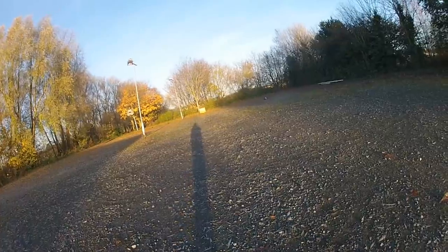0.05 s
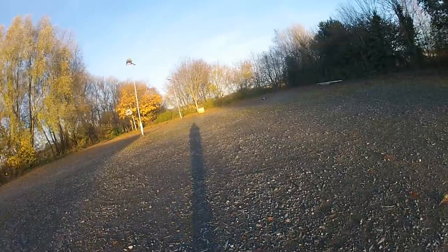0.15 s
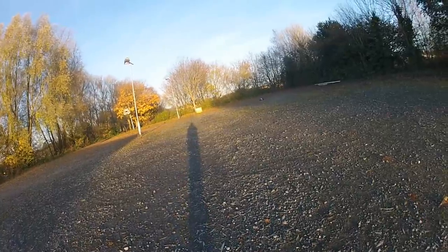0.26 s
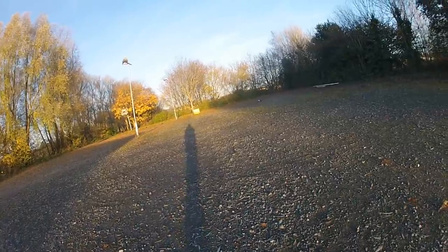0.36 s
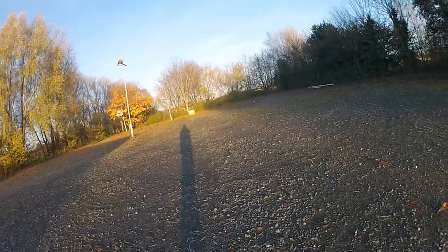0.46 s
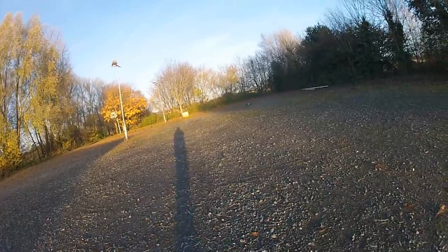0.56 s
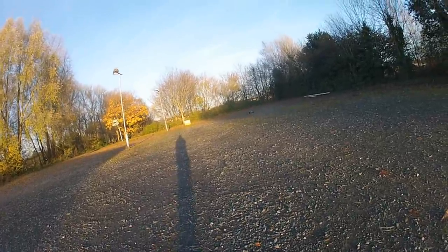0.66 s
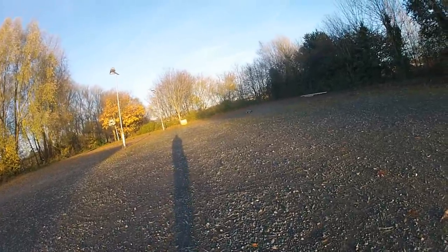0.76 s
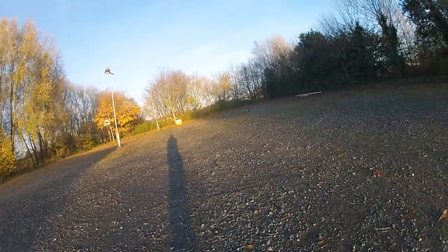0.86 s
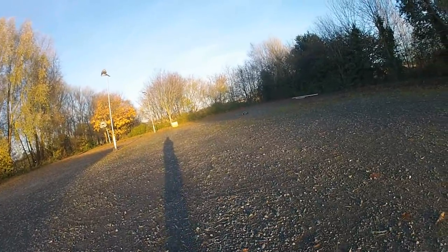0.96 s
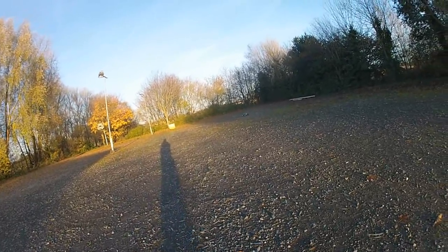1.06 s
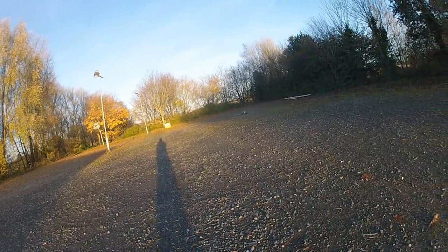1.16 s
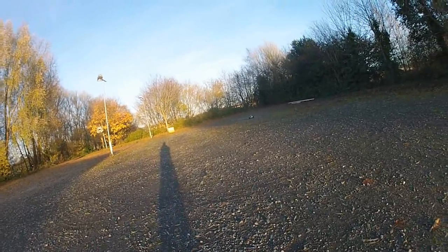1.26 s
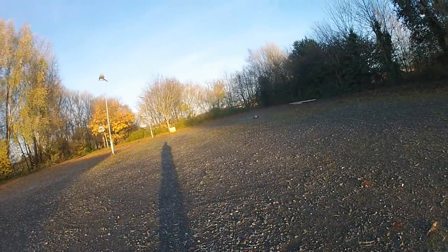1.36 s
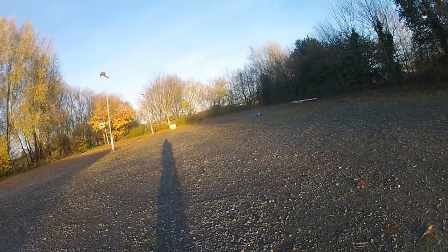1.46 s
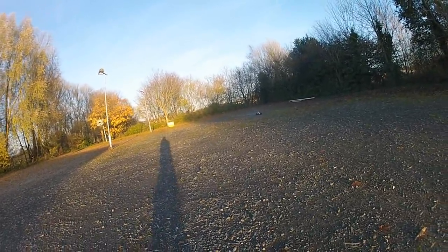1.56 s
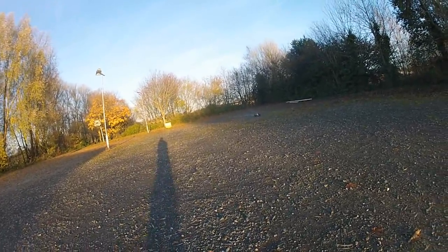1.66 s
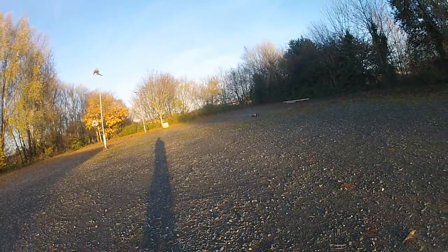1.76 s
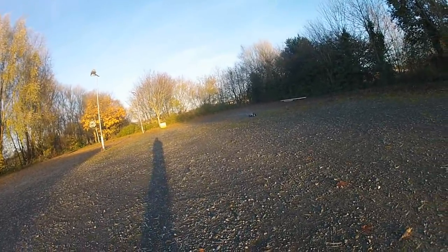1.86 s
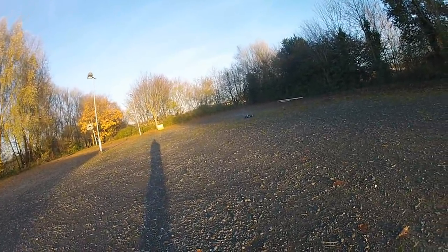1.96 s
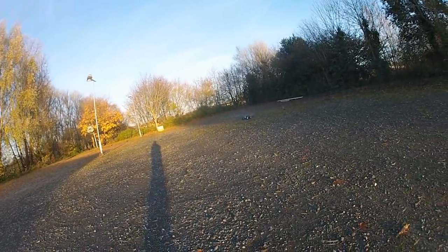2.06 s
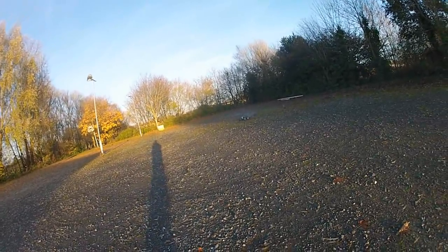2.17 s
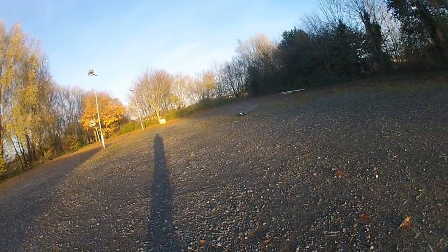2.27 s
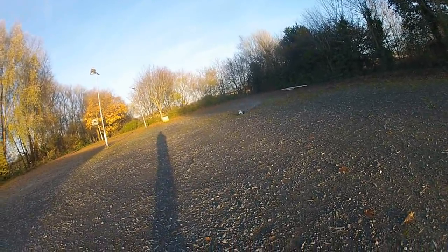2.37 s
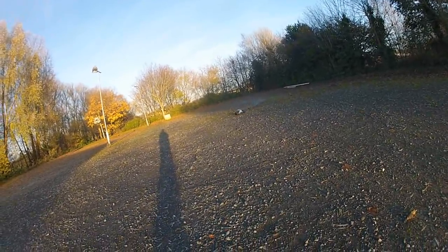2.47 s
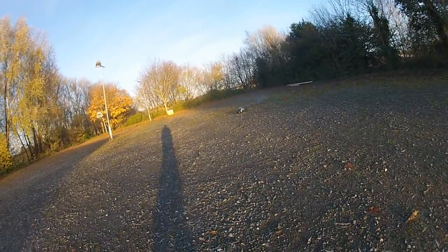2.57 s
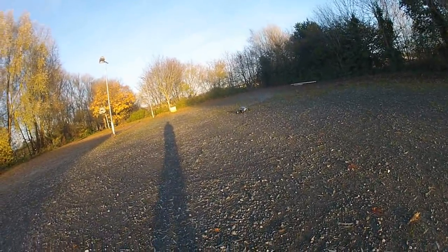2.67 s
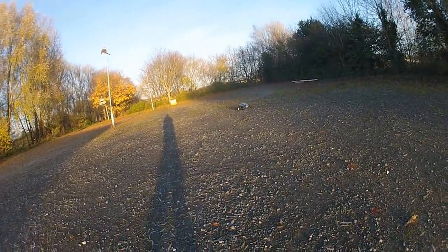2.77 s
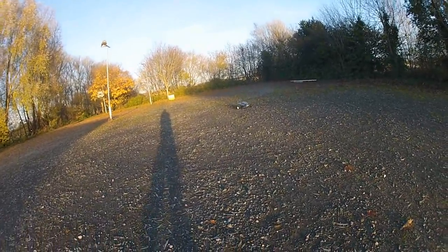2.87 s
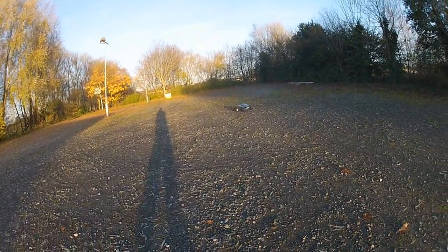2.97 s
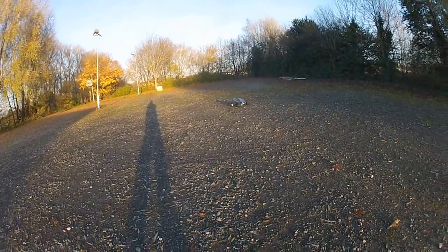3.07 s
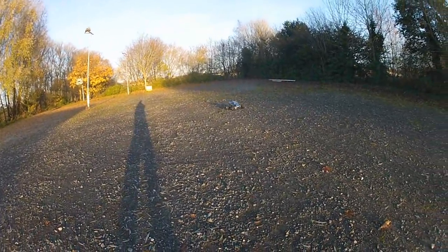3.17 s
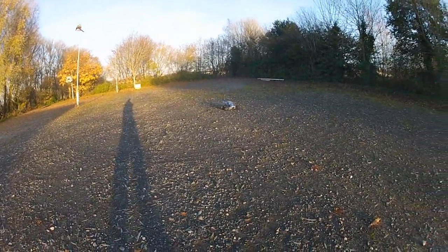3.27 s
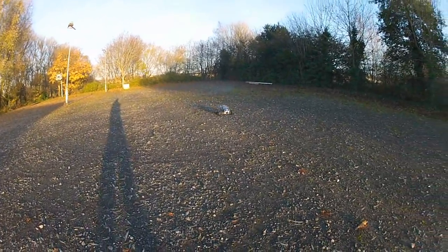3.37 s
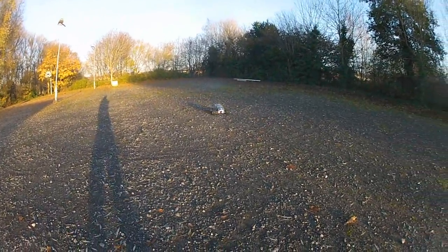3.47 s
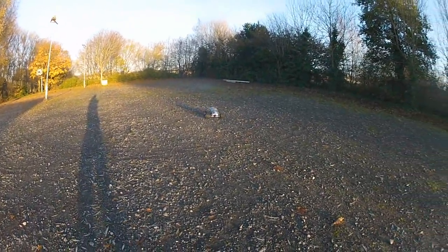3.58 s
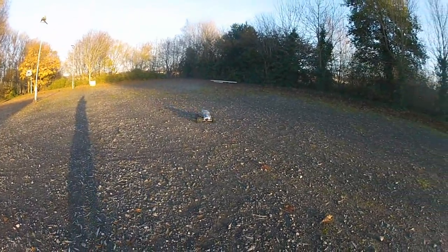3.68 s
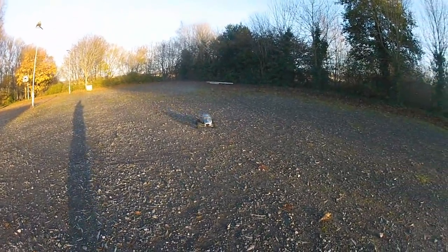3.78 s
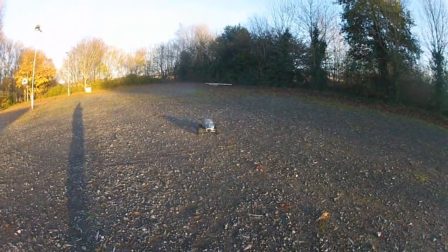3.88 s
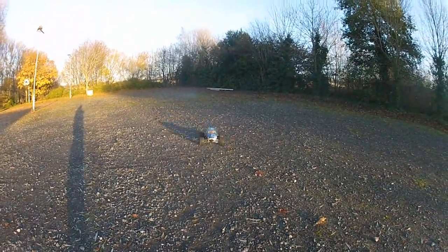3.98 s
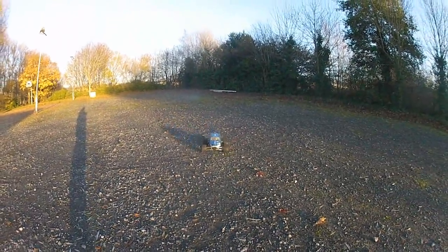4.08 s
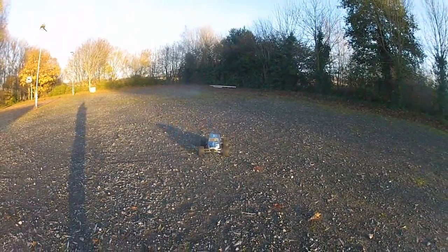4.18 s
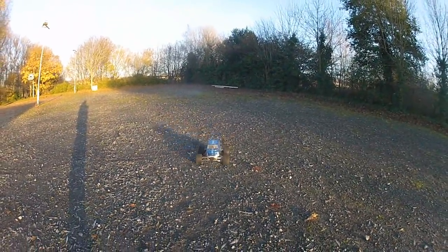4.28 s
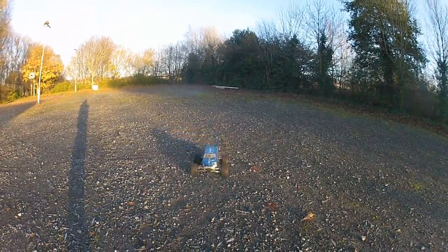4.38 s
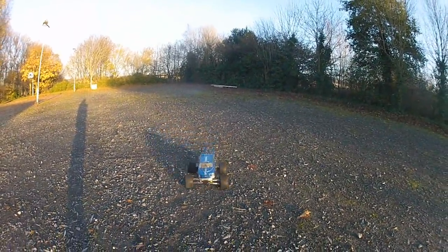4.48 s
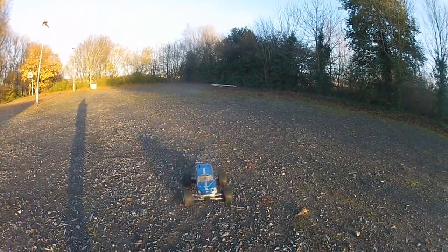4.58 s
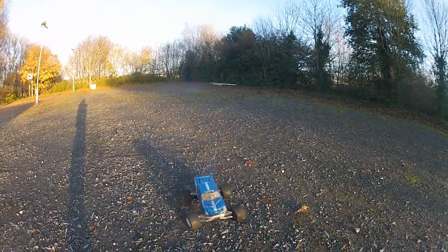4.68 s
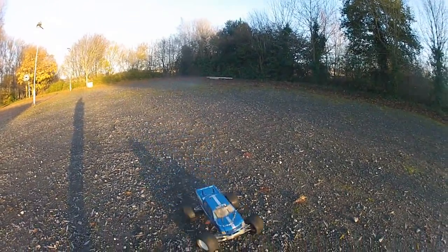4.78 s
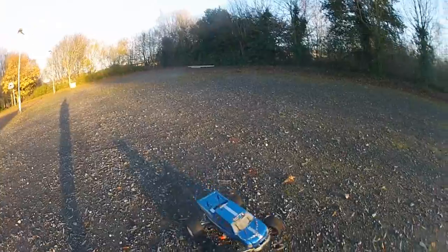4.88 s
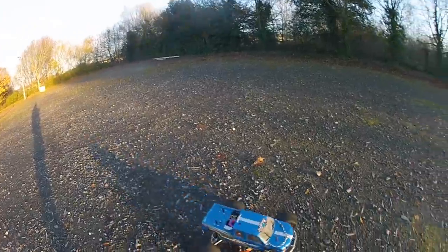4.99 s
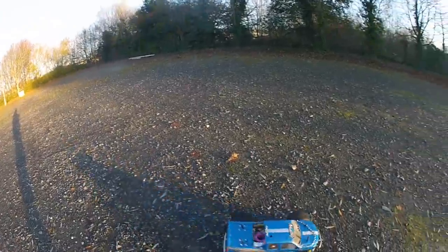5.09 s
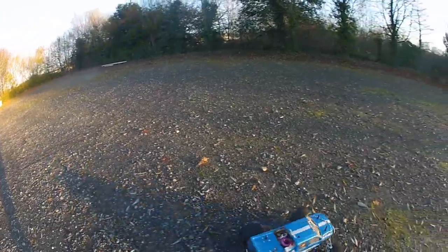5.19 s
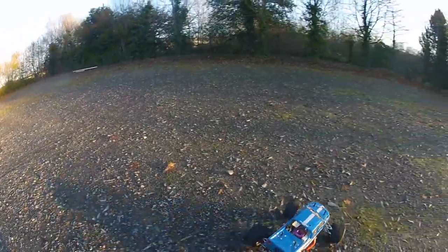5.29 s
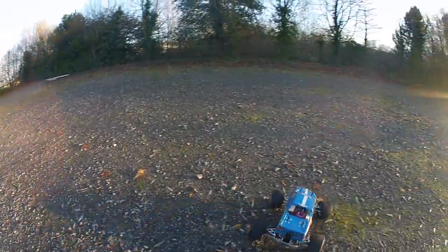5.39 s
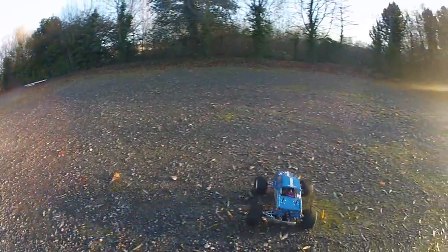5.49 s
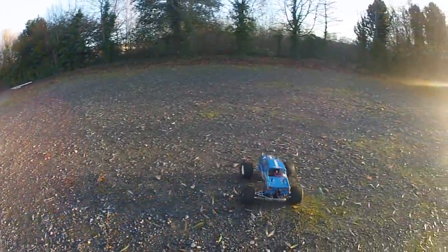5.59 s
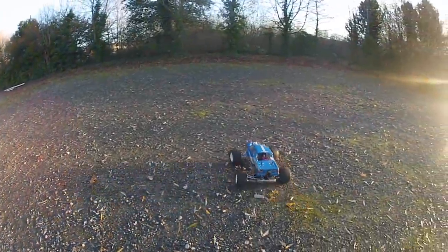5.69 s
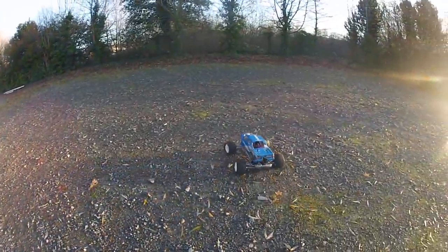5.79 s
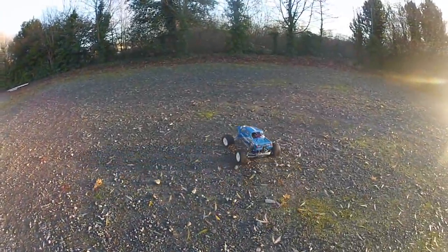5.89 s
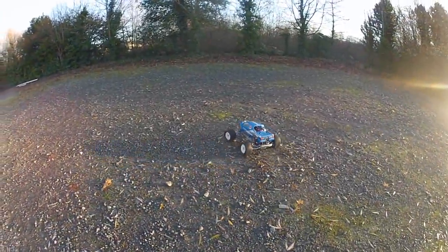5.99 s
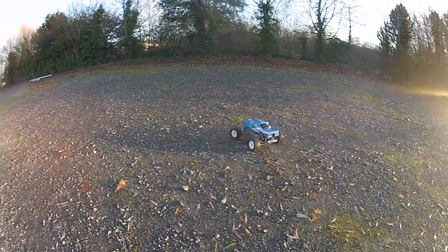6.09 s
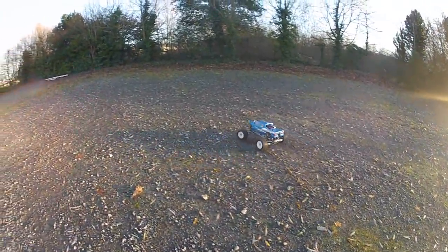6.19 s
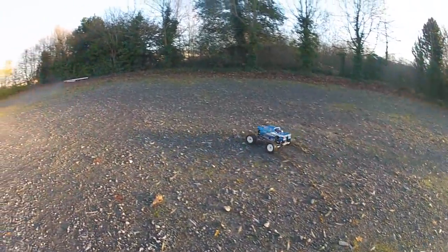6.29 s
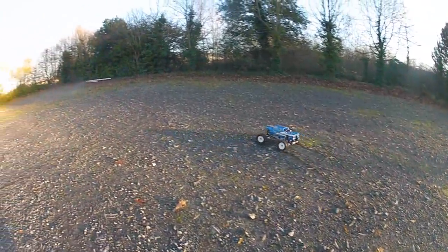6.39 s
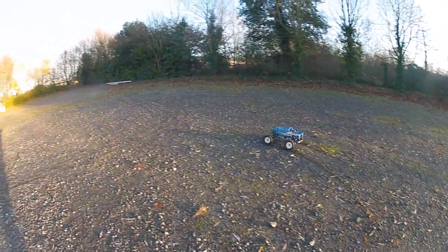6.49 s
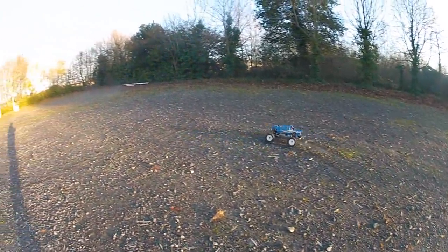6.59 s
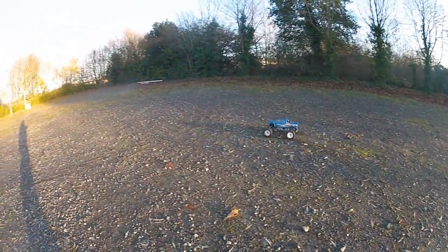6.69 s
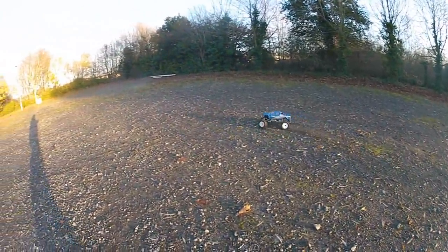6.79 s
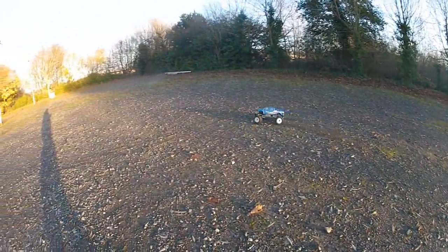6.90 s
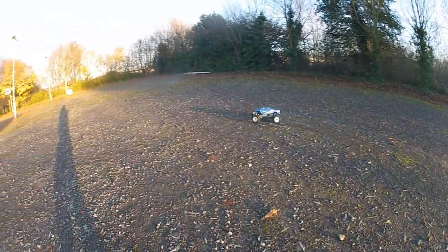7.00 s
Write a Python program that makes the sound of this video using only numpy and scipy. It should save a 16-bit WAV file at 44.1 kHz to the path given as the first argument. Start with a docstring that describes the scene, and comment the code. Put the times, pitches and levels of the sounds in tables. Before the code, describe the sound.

A small two-stroke model truck buzzes far off, climbs to a scream, coasts up close with a metallic whine, then pulls hard again outdoors.

```python
"""A small two-stroke engine on a model truck revs far off on a gravel lot, coasts up close and pulls hard again.
Each turn of the crank fires one exhaust pulse, which rings in the pipe; a thin metallic whine rides on top.
The lot adds echoes and the ground thins three bands. Shaped noise makes the wind and the roll of the tyres,
short low rings make the knocks on a hard camera case, and snaps of noise make ticks and one hard burn.
The camera's recorder holds each sample for 1/12000 s, which adds a mirrored treble."""
import sys
import numpy as np
from scipy import signal
from scipy.fft import rfft, irfft, next_fast_len
from scipy.io import wavfile
from scipy.ndimage import uniform_filter1d

SR = 44100
rng = np.random.default_rng(int(sys.argv[2]) if len(sys.argv) > 2 else 0)


def transcribe(signal):
    """Save signal, clipped to [-1, 1], as a 16-bit WAV file at the path in sys.argv[1]."""
    frames = np.atleast_2d(signal).T
    limited = np.clip(frames, -1, 1)
    pcm = np.round(limited * 32767).astype(np.int16)
    wavfile.write(sys.argv[1], SR, pcm)


N = 310905
TIME = np.arange(N) / SR


def gain_of(db):
    """Turns decibels into a plain multiplier."""
    return 10 ** (np.asarray(db) / 20)


def evened(x):
    """Scales a sound to an average strength (rms) of 1."""
    return x / np.sqrt(np.mean(x ** 2) + 1e-20)


def steadied(x, size=4096):
    """Holds the running strength (rms over size samples) at 1."""
    return x / np.sqrt(abs(uniform_filter1d(x ** 2, size)) + 1e-20)


def columns(table):
    """Draws each column of a timed table as a curve with one value per sample."""
    seconds, *values = np.transpose(table)
    return [np.interp(TIME, seconds, v) for v in values]


def share_of(table):
    """Draws a one-column table as a curve kept between 0 and 1."""
    return np.clip(columns(table)[0], 0, 1)


def coloured(x, points):
    """Filters a sound by a spectrum given as (Hz, dB) points."""
    size = next_fast_len(N + 8192)
    hz = np.fft.rfftfreq(size, 1 / SR)
    point_hz, point_db = np.transpose(points)
    db = np.interp(np.log(hz + 1), np.log(point_hz + 1), point_db)
    return irfft(rfft(x, size) * gain_of(db), size)[:N]


def resonate(x, hz, width_hz):
    """Keeps a band around a moving pitch: shifts it down to zero, smooths, and shifts back."""
    turn = np.exp(2j * np.pi * np.cumsum(hz * np.ones(len(x))) / SR)
    r = np.exp(-np.pi * width_hz / SR)
    smooth = signal.lfilter([1 - r], [1, -r], x / turn)
    return 2 * (turn * smooth).real


def drift(seconds):
    """Wanders by chance with rms 1, its noise smoothed twice over this many seconds."""
    size = round(seconds * SR)
    return evened(uniform_filter1d(uniform_filter1d(rng.standard_normal(N), size), size))


def bumps(table):
    """Adds up smooth humps, one for each row of middle, height and spread."""
    return sum(height * np.exp(-.5 * ((TIME - s) / spread) ** 2) for s, height, spread in table)


# How near the truck is. Each row: time in seconds, closeness in dB.
CLOSENESS = [(0, -35.5), (.7, -23), (1.3, -15.5), (2.2, -9), (2.7, -7.5), (3.1, -9.5), (3.7, -12.5),
             (4.4, -6.5), (4.9, 3.5), (5.15, 10.5), (5.8, -2), (6.3, -2), (7.05, 10)]
# How far the throttle is open. Each row: time in seconds, opening from 0 (shut) to 1 (open).
THROTTLE = [(0, 0.8), (1.4, 0.22), (2.1, 0.41), (2.3, 0.44), (2.36, 0.17), (2.65, 0.42), (2.95, 0),
            (4.5, 0.23), (5.4, 0.39), (5.55, 0.86), (7.05, 0.58)]
# How two layers follow the truck. Each entry: level in dB at closeness 0 with the throttle shut,
# dB for each dB of closeness, dB added by full throttle.
LAYERS = {"body": (-39.5, 0.59, 15.9), "roll": (-30, 0.61, 0)}


def level(name):
    """Sets a layer's gain: a nearer truck and a wider throttle can each make it louder."""
    base_db, slope, throttle_db = LAYERS[name]
    return gain_of(base_db + slope * columns(CLOSENESS)[0] + throttle_db * share_of(THROTTLE))


# The smooth engine speed. Each row: time in seconds, firings a second.
ENGINE_SPEED = [(0, 204), (.1, 237), (.19, 248), (.45, 251), (.95, 305), (1.22, 335), (1.33, 317),
                (1.4, 342), (1.62, 350), (1.72, 385), (2.03, 400), (2.15, 390), (2.27, 416), (2.312, 412),
                (2.335, 336), (2.37, 338), (2.39, 300), (2.41, 299), (2.44, 268), (2.535, 274),
                (2.575, 294), (2.595, 317), (2.64, 330), (2.68, 324), (2.73, 325), (2.79, 270), (2.84, 240),
                (2.98, 226), (3.06, 190), (3.32, 182), (3.78, 159), (4.15, 149), (4.53, 146), (4.75, 142),
                (4.91, 139), (5.25, 139), (5.28, 145), (5.45, 147.4), (5.54, 169.6), (5.61, 180),
                (5.79, 187.4), (6.12, 195.4), (6.3, 207.2), (6.67, 256), (6.78, 279), (6.8, 275),
                (6.84, 291), (6.92, 296), (6.94, 306), (6.96, 304), (6.995, 311), (7.05, 306)]


def firing_rate():
    """Gives the smooth engine speed in Hz, before skips and flutter."""
    return columns(ENGINE_SPEED)[0]


# Tone of the wind rumble. Each row: pitch in Hz, relative level in dB per Hz.
WIND_TONE = [(15, -29), (30, -7.5), (55, 0.5), (100, -4), (200, -9), (350, -16), (500, -25), (1000, -55.5)]
# Gusts over the steady wind. Each row: middle in seconds, rise in dB (below zero a lull), spread in seconds.
GUSTS = [(.3, -3.5, 0.22), (1.55, -2, 0.072), (3.18, 7.5, 0.089), (4.398, 3, 1), (5.057, 9, 0.16),
         (6.595, 4.5, 0.14)]
WIND_DB = -41  # steady level


def wind(lumps_db=2.6):
    """Wind pushing on the microphone: a lumpy low rumble of filtered noise with gusts."""
    lumpy = rng.standard_normal(N) * gain_of(lumps_db * drift(0.17))
    return gain_of(WIND_DB + bumps(GUSTS)) * evened(coloured(lumpy, WIND_TONE))


# Tone of the rolling noise. Each row: pitch in Hz, relative level in dB per Hz.
ROLL_TONE = [(80, -45), (160, -5), (260, -2.5), (420, -7.5), (700, -17.5), (1500, -12.5), (2500, -17.5),
             (4000, -22.5), (5800, -35.5)]
ROLL_SPEED_DB = 1.5  # added for each doubling of the revs


def roll(lumps_db=1.7):
    """Tyres and air: dull, grainy filtered noise that grows with closeness and revs."""
    grainy = rng.standard_normal(N) * gain_of(lumps_db * drift(0.023))
    speed_gain = gain_of(ROLL_SPEED_DB * np.log2(firing_rate() / 200))
    return level("roll") * speed_gain * evened(coloured(grainy, ROLL_TONE))


# Knocks on the case. Each row: start in seconds, peak in dB, pitch in Hz.
KNOCKS = [(0.4773, -14, 260), (0.699, -23.5, 265), (0.737, -16.5, 265), (0.854, -25, 271),
          (0.999, -32, 297), (1.307, -26, 295), (1.341, -22, 152), (1.59, -25, 99), (1.789, -23.5, 384),
          (1.911, -29, 213), (2.178, -25, 366), (2.422, -20, 226), (2.641, -23, 229), (2.712, -19.5, 275),
          (2.8, -22, 200), (3.157, -13, 228), (3.384, -30, 172), (6.697, -17.5, 198), (6.836, -15, 260),
          (6.882, -19, 240), (7.016, -12, 345)]


def knocks(t60=0.07):
    """The case rings low and briefly at three pitches; t60 is the seconds to fall by 60 dB."""
    out, t = np.zeros(N + 8000), np.arange(4000) / SR
    for (s, db, hz), turn in zip(KNOCKS, rng.random((len(KNOCKS), 2))):
        boom = -np.sin(2 * np.pi * hz * t)
        boom += 0.61 * np.sin(2 * np.pi * (0.5 * hz * t + turn[0]))
        boom += 0.26 * np.sin(2 * np.pi * (2.15 * hz * t + turn[1]))
        boom *= (1 - np.exp(-t / 0.000061)) * gain_of(-60 * t / t60)
        out[round(s * SR):][:4000] += gain_of(db) * boom / abs(boom).max()
    return out[:N]


# Sharp ticks and softer crackles; the one at 4.916 s is a single hard burn of the engine.
# Each row: start in seconds, peak in dB, pitch in Hz,
# strength of the treble snap in dB before the whole sound is scaled to its peak.
TICKS_AND_BURN = [(0.4748, -16, 2000, 2), (0.7395, -12, 2080, -4), (1.339, -14, 2070, -4),
                  (2.5928, -16, 1750, -6), (4.916, -10, 2100, -6), (1.104, -26, 1100, -18),
                  (1.13, -27, 1270, -18), (1.594, -27, 1500, -14), (1.6714, -24, 1500, -20),
                  (1.8474, -28, 1280, -20), (2.016, -26, 1610, -20), (2.179, -22, 1430, -20),
                  (2.635, -23, 1900, -20), (2.7075, -22, 1400, -20), (2.755, -24, 1000, -20),
                  (2.796, -21, 1330, -16), (2.8966, -24, 1420, -20)]


def ticks_and_burn(t60=0.02, ring_t60=0.035):
    """Each is a fading burst of noise around one pitch, a treble snap and a brief high ring."""
    out, t = np.zeros(N + 8000), np.arange(4000) / SR
    for (s, db, hz, snap_db), hiss in zip(TICKS_AND_BURN, rng.standard_normal((len(TICKS_AND_BURN), 4000))):
        band = resonate(resonate(hiss, hz, 2040), hz, 2040)
        snap = gain_of(snap_db) * np.diff(hiss, prepend=0)
        burst = (band + snap) * gain_of(-60 * t / t60)
        burst += 0.45 * np.sin(2 * np.pi * hz * t) * gain_of(-60 * t / ring_t60)
        out[round(s * SR):][:4000] += gain_of(db) * burst / abs(burst).max()
    return out[:N]


# Share of the engine's power that arrives scattered by ground and trees. Each row: time in seconds, share 0 to 1.
SCATTER = [(0, .14), (.8, .1), (2.2, .1), (2.35, .05), (2.8, .08), (3.4, .25), (4.5, .07), (5.4, .07),
           (5.6, .04), (7.05, .03)]
# Filter for the long waves that pass unscattered. Each row: pitch in Hz, level in dB.
LONG_WAVES = [(500, 0), (900, -40)]


def lot(x, t60=0.37, first_s=.006):
    """Sparse, fading echoes smear the tones when the revs move; three sets of them take turns over time."""
    share, t = share_of(SCATTER), np.arange(12000) / SR
    taps = rng.standard_normal((3, 12000)) * (rng.random((3, 12000)) < .03)
    taps *= (t > first_s) * gain_of(-60 * t / t60)
    taps /= np.linalg.norm(taps, axis=1)[:, None]
    # the squares of the three turns sum to 1.5 before the factor, 1 after
    turn = np.sqrt(2 / 3) * np.cos(np.pi * (TIME / 0.776 + np.arange(3)[:, None] / 3))
    echoes = signal.fftconvolve(x * np.sqrt(share) * turn, taps, axes=1).sum(0)[:N]
    low = coloured(x, LONG_WAVES)  # long waves pass the stones and leaves unscattered
    return low + np.sqrt(1 - share) * (x - low) + echoes - coloured(echoes, LONG_WAVES)


# Bands cancelled by the echo off the ground. Each row: time in seconds, pitch of the lower band in Hz,
# depth from 0 to 1.
GROUND_DIP = [(0, 3550, .2), (.8, 3300, .5), (2.5, 3280, .7), (3.4, 3300, .7), (3.7, 2720, .75),
              (4.4, 2700, .85), (4.7, 2690, 1), (5.4, 2670, 1), (5.6, 2860, .7), (6.2, 3130, .7),
              (7.05, 3360, .7)]
DIP_WIDTH_HZ, SECOND_DIP, SECOND_WIDTH_HZ = 420, 1.77, 900  # the second band lies 1.77 times higher


def ground_echo(x):
    """The echo off the ground cancels two moving bands, so each is taken out of the sound."""
    dip_hz, depth = columns(GROUND_DIP)
    x = x - depth * resonate(x, dip_hz, DIP_WIDTH_HZ)
    return x - depth * resonate(x, SECOND_DIP * dip_hz, SECOND_WIDTH_HZ)


# A narrow moving band thinned by the engine's echo off the ground. Each row: time in seconds, pitch in Hz,
# depth from 0 to 1.
LOW_GROUND_GAP = [(0, 1740, 0.66), (4.45, 1920, 0), (4.55, 1510, 0.7), (4.7, 1540, 1), (4.95, 1480, 1),
                  (5.1, 2000, 0.35), (5.3, 2040, .65), (5.45, 1910, 0.2), (5.65, 2010, 1), (6.05, 1810, 0),
                  (6.2, 1930, 0.6), (6.35, 1880, 0.5), (6.6, 2100, 0), (7.05, 2100, 0)]
GAP_WIDTH_HZ = 144


def low_ground_gap(x):
    """The engine's echo off the ground also thins a narrow moving band at a lower pitch."""
    gap_hz, depth = columns(LOW_GROUND_GAP)
    return x - np.clip(depth, 0, 1) * resonate(x, gap_hz, GAP_WIDTH_HZ)


def ring(x, hz, damping, narrow_hz=150, wide_hz=560):
    """Rings at a moving pitch, blending a narrow band into a wide one as damping grows; ends near rms 1."""
    share = np.clip(damping, 0, 1)
    narrow = steadied(resonate(resonate(x, hz, narrow_hz), hz, narrow_hz))
    wide = steadied(resonate(resonate(x, hz, wide_hz), hz, wide_hz))
    return steadied((1 - share) * narrow + share * wide)


# Flares of the revs as the wheels skip over stones. Each row: middle in seconds, rise in Hz before its
# short-time mean is taken off (below zero a sag as the wheels bite).
SKIPS = [(0.884, 24), (.945, 12), (0.997, 36), (1.062, 46), (1.107, 42), (1.167, 55), (1.213, 41),
         (1.294, 34), (1.384, 37.5), (1.536, 30), (1.635, 38.5), (1.758, 51), (1.808, 26.5), (1.873, 42),
         (1.956, 17.5), (2.044, 31), (2.126, 22), (2.163, 55.5), (2.207, 42), (2.262, 50), (2.299, 27),
         (2.37, 14.5), (2.635, 16), (2.7, 30), (6.822, 19), (6.885, 5), (6.976, 11), (7.02, 31),
         (1.568, -19.5), (1.781, -29), (1.892, -35), (2.106, -4.5), (2.187, -28), (2.235, -37)]
# How bumpy the ride is. Each row: time in seconds, share of small skips from 0 to 1.
BUMPY = [(0, 0), (.7, 0), (.8, 1), (2.3, 1), (2.4, .3), (2.58, .3), (2.65, .8), (2.85, 0), (6.75, 0),
         (7.05, .25)]
SMALL_SKIP_HZ = 7  # rms at full share, before the short-time mean is taken off


def crank_turns(skip_s=0.0095, flutter=0.005):
    """Counts turns of the crank: the smooth speed with skips, sags and a slight flutter."""
    flare = bumps([(s, rise, skip_s) for s, rise in SKIPS])
    flare = flare + SMALL_SKIP_HZ * columns(BUMPY)[0] * drift(skip_s)
    hz = firing_rate() + flare - uniform_filter1d(flare, size=5000)
    return np.cumsum(hz * (1 + flutter * drift(0.0132))) / SR


# How rough the burn is. Each row: time in seconds, share of noise from 0 to 1.
ROUGH = [(0, .12), (.7, .1), (1.0, .09), (2.3, .1), (2.38, .05), (2.56, .05), (2.62, .08), (2.8, .14),
         (2.95, .4), (3.5, .3), (4.6, .21), (5.4, .24), (5.55, .03), (6.7, .025), (7.05, .04)]
# Top of the clean exhaust tones, leaving hiss above. Each row: time in seconds, pitch in Hz.
CLEAN_TOP = [(0, 4400), (.7, 4400), (.9, 3300), (2.9, 3300), (3.4, 4400)]


def exhaust(turns, fired, rough, burn_strength, bounce):
    """One pulse a turn, a stack of firing tones, mixed with puffs of noise that fade after each firing."""
    top = columns(CLEAN_TOP)[0] / firing_rate()
    pulses = -sum(np.cos(2 * np.pi * k * fired) * np.clip(top - k, 0, 1) for k in range(4, 34))
    puffs = (.12 + np.exp(-(fired % 1) / .17)) * rng.standard_normal(N)
    mix = np.sqrt(1 - rough) * steadied(pulses) + np.sqrt(rough) * evened(puffs)
    return mix * burn_strength * bounce, puffs


# Low ring of the pipe as the truck turns. Each row: time in seconds, pitch in Hz, level in dB.
LOW_RING = [(0, 1360, -46), (.25, 1470, -44.5), (.5, 1490, -60), (.8, 1310, -44), (1.33, 1170, -58),
            (1.63, 1330, -47.5), (2.47, 1546, -40.5), (3.15, 1466, -29.5), (3.61, 1420, -43.5),
            (4.4, 1620, -36.5), (4.65, 1650, -32.5), (4.89, 1580, -48), (5.12, 1150, -31.5),
            (5.34, 1600, -28), (5.63, 1330, -40), (5.77, 1655, -26), (6.26, 1660, -22.5), (6.67, 1465, -28),
            (6.87, 1730, -25), (7.05, 1780, -22.5)]
# Damping of the low ring, least when the pipe points this way. Each row: time in seconds, 0 narrow to 1 wide.
LOW_DAMPING = [(0, .3), (.65, .5), (.8, .8), (2.1, .75), (2.35, .6), (2.7, .8), (2.9, .2), (3.4, .15),
               (3.7, 1), (5.5, 1), (5.8, .6), (6.6, .7), (6.8, .95), (7.05, .9)]
# High ring of the pipe. Each row: time in seconds, pitch in Hz, level in dB.
HIGH_RING = [(0, 2380, -56), (.7, 2440, -59), (1.2, 2160, -72), (2.1, 2240, -90), (2.65, 2100, -41),
             (3.12, 2210, -59), (3.61, 2370, -41), (4.4, 2310, -37.5), (4.63, 2050, -37), (4.92, 2080, -26),
             (5.12, 2330, -32), (5.4, 2290, -34), (5.77, 2230, -22.5), (6.09, 2160, -27), (6.3, 2070, -28),
             (6.7, 2350, -30.5), (6.9, 2460, -28), (7.05, 2630, -24)]
# Damping of the high ring. Each row: time in seconds, 0 narrow to 1 wide.
HIGH_DAMPING = [(0, .7), (3.3, .9), (3.6, .4), (4.4, .45), (4.65, .65), (5.0, .65), (5.15, .45), (5.45, .5),
                (5.6, .6), (6.6, .7), (7.05, .95)]
# Upper ring of the pipe. Each row: time in seconds, level in dB.
UPPER_RING = [(0, -57), (.6, -58), (1.3, -62), (2.7, -61.5), (4.4, -54), (5.15, -41), (6.2, -38.5),
              (7.05, -33.5)]
UPPER_RING_HZ, UPPER_WIDTH_HZ = 3100, 810


def pipe_rings(drive, rough):
    """The exhaust pulses set three resonances of the pipe ringing."""
    (low_hz, low_db), (high_hz, high_db) = columns(LOW_RING), columns(HIGH_RING)
    out = gain_of(low_db) * ring(drive, low_hz, columns(LOW_DAMPING)[0])
    out += gain_of(high_db) * ring(drive, high_hz, columns(HIGH_DAMPING)[0], wide_hz=800)
    rasp = drive + (.15 + 4 * rough) * rng.standard_normal(N)
    upper = ring(rasp, UPPER_RING_HZ, 1.0, wide_hz=UPPER_WIDTH_HZ)
    return out + gain_of(columns(UPPER_RING)[0]) * upper


# A thin metallic whine, likely the clutch bell. Each row: time in seconds, level in dB.
WHINE = [(0, -62), (.33, -54), (1.08, -57.5), (2.4, -55), (2.71, -48), (2.96, -60), (3.83, -49.5),
         (4.34, -39), (4.9, -33), (5.0, -25), (5.36, -24.5), (5.44, -34), (5.53, -28.5), (6.15, -29.5),
         (6.3, -37.5), (6.58, -31), (7.05, -44)]
WHINE_HZ, WHINE_RISE_HZ, WHINE_WAVER = 3813, 102, .004  # climbs as the throttle opens; wavers by this share
WHINE_FLICKER_DB, WHINE_FLICKER_S = 1.8, .02


def whine(drive, puffs):
    """Metal struck by the burns and rubbed under load rings high, with a faint upper mode."""
    throttle = share_of(THROTTLE)
    hz = (WHINE_HZ + WHINE_RISE_HZ * throttle) * (1 + WHINE_WAVER * drift(0.092))
    gain = gain_of(columns(WHINE)[0] + WHINE_FLICKER_DB * drift(WHINE_FLICKER_S))
    rattle = drive + (.35 + .8 * throttle) * rng.standard_normal(N)
    main = ring(rattle, hz, .7 * (1 - throttle), narrow_hz=140, wide_hz=330)
    return gain * (main + gain_of(-32.0) * ring(puffs, 5285, 0.2))


# The firing tone and its octave. Each row: time in seconds, firing tone in dB, octave in dB.
FIRING_TONE = [(0, -40.5, -43.5), (.45, -39, -43), (.85, -37.5, -49), (1.2, -36, -43), (1.4, -41, -47.5),
               (1.85, -36, -42), (2.22, -30.5, -41.5), (2.36, -39.5, -61), (2.55, -36.5, -42.5),
               (2.7, -35.5, -56), (2.8, -42.5, -45), (3.1, -39, -51), (3.35, -39.5, -60),
               (3.73, -36, -50.5), (4.5, -28.5, -41.5), (5.04, -24.5, -37.5), (5.55, -20, -28),
               (6.3, -21.5, -27), (6.67, -24, -27.5), (6.9, -29, -28), (7.05, -41, -26.5)]
# The tone at three times the firing rate. Each row: time in seconds, level in dB.
THIRD_TONE = [(0, -54), (.5, -48), (.9, -50), (1.1, -45), (1.4, -51.5), (2.2, -42), (2.4, -54),
              (2.68, -43.5), (2.8, -52), (3, -67), (4.5, -49.5), (5.3, -38.5), (5.6, -40), (5.95, -45),
              (6.3, -34.5), (6.7, -36.5), (7.05, -43)]


def low_tones(turns, fired, bounce, lead=0.38):
    """The three lowest tones: two follow the crank, the third the uneven firing; all waver in strength."""
    first_db, second_db = columns(FIRING_TONE)
    third_db = columns(THIRD_TONE)[0]
    first = gain_of(first_db + 0.24 * drift(0.17)) * np.cos(2 * np.pi * (turns - lead))
    second = gain_of(second_db + 0.5 * drift(0.0089)) * np.cos(4 * np.pi * (turns - lead))
    third = gain_of(third_db + 1.5 * drift(0.03)) * np.cos(6 * np.pi * fired)
    return np.sqrt(2) * (first + bounce * (second - third))  # root 2 makes the dB levels rms


# Tone of the engine's body. Each row: pitch in Hz, relative level in dB.
BODY_TONE = [(450, 10), (600, 8.5), (850, 20.5), (1050, 6.5), (1250, 17), (1900, 15.5), (2500, 14.5),
             (2750, -10), (4200, 8), (4700, -2.5), (5600, -27), (6000, -58)]
BOUNCE_DB, BOUNCE_S = 2, .012  # bouncing breaks up the level


def engine(uneven_db=2.6, jitter=0.055):
    """Fires once a turn; a rougher burn makes the strength and moment of each firing less even."""
    rough = share_of(ROUGH)
    turns = crank_turns()
    bounce = gain_of(BOUNCE_DB * columns(BUMPY)[0] * drift(BOUNCE_S))
    burn = rng.standard_normal((4000, 2))[(turns + .3).astype(int)]  # one strength and moment per burn
    burn_strength = uniform_filter1d(gain_of(uneven_db * rough * burn[:, 0]), size=30)
    fired = turns + uniform_filter1d(jitter * rough * burn[:, 1], size=60)
    drive, puffs = exhaust(turns, fired, rough, burn_strength, bounce)
    body = level("body") * steadied(coloured(drive, BODY_TONE))
    return body + pipe_rings(drive, rough) + whine(drive, puffs) + low_tones(turns, fired, bounce)


def scene():
    """Mixes wind, roll, engine, knocks, ticks and the hard burn at one microphone."""
    truck = lot(low_ground_gap(engine()))
    outdoors = ground_echo(truck + wind() + roll())
    return (outdoors + knocks() + ticks_and_burn())[None]


HOLD_HZ, EDGE_HZ = 12000, 15300  # samples held a second; top of the recorder's band


def record(dry):
    """Held samples mirror the sound around 12 kHz under a sinc slope; then the band limit cuts the top."""
    size = next_fast_len(N + 8192)
    hz = np.fft.rfftfreq(size, 1 / SR)
    # the sound runs on, mirrored in time, past both ends
    padded = np.pad(dry, [(0, 0), (4096, size - N - 4096)], "reflect")
    narrow = irfft(rfft(padded) * np.clip((HOLD_HZ / 2 - hz) / 250, 0, 1), size)
    mirrored = narrow * (1 + 2 * np.cos(2 * np.pi * HOLD_HZ * np.arange(size) / SR))
    slope = np.sinc(hz / HOLD_HZ) * np.clip((EDGE_HZ - hz) / 300, 0, 1)
    held = irfft(rfft(mirrored) * slope, size)
    return held[:, 4096:4096 + N]


dry = scene()
out = record(dry)
transcribe(out)
```